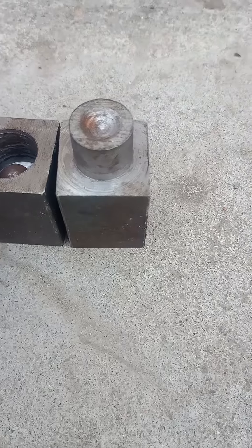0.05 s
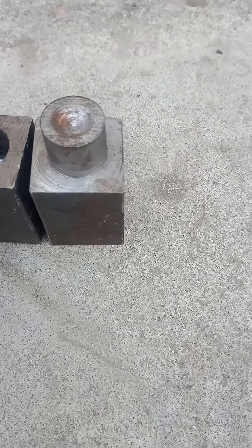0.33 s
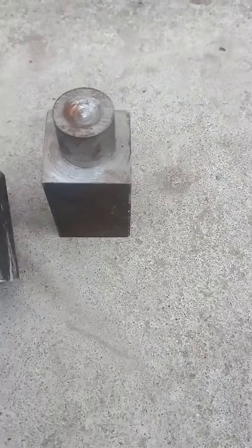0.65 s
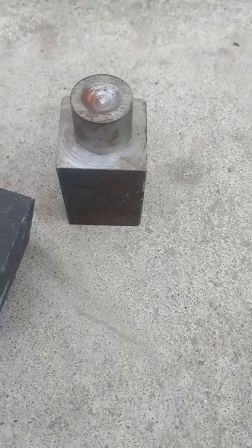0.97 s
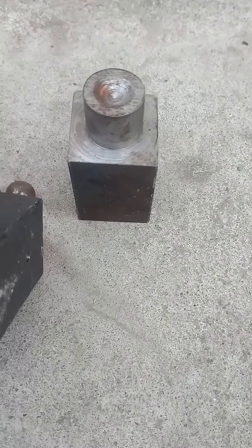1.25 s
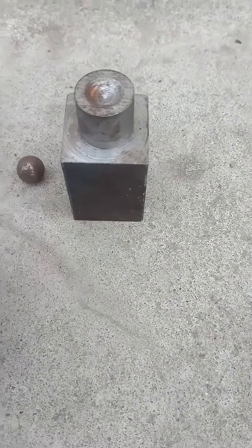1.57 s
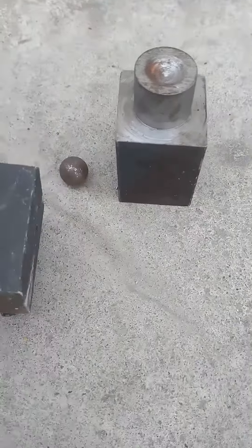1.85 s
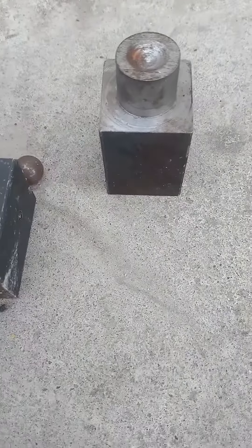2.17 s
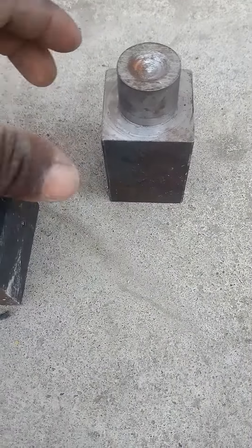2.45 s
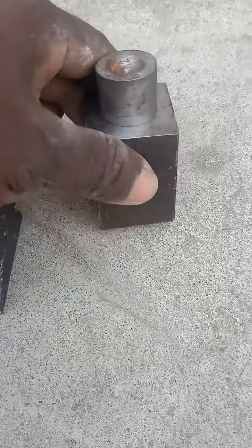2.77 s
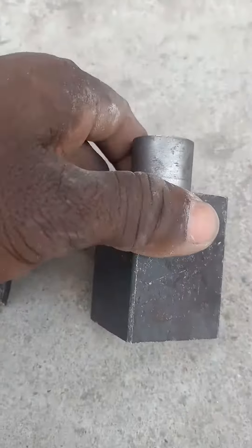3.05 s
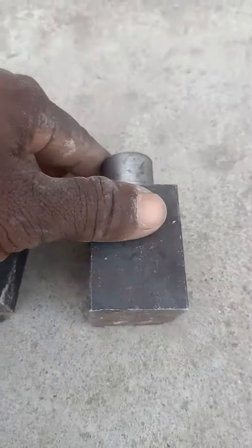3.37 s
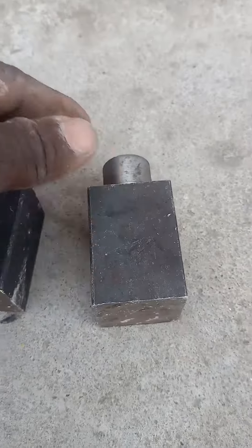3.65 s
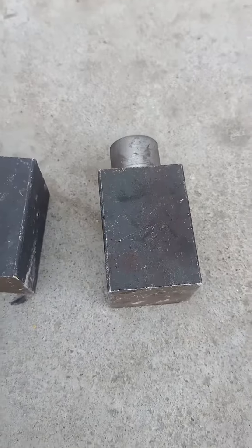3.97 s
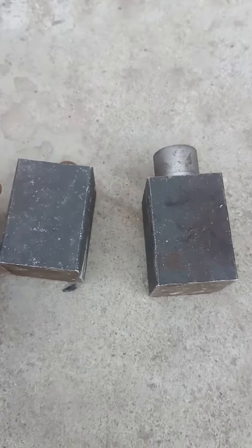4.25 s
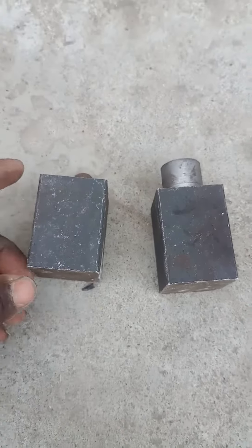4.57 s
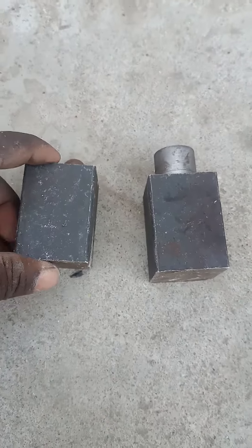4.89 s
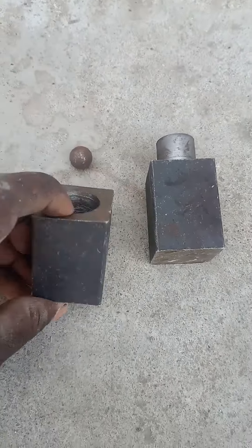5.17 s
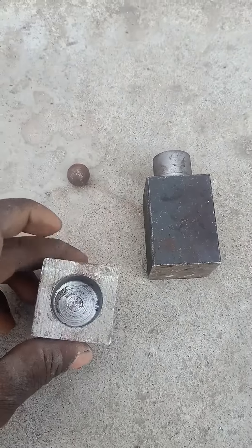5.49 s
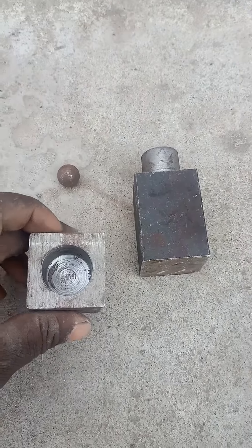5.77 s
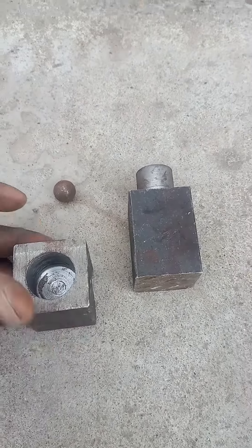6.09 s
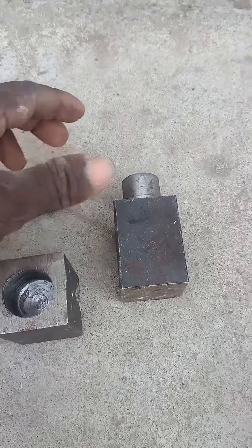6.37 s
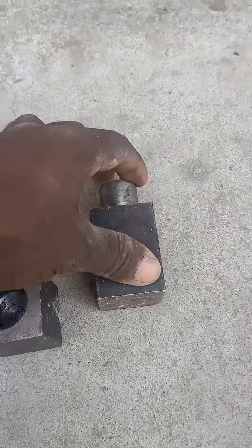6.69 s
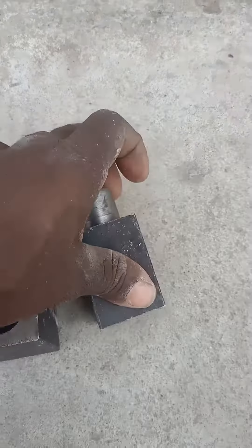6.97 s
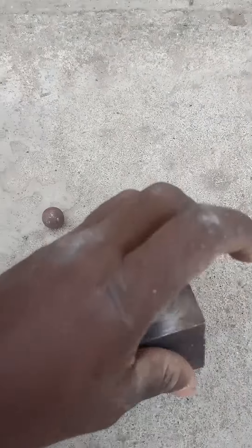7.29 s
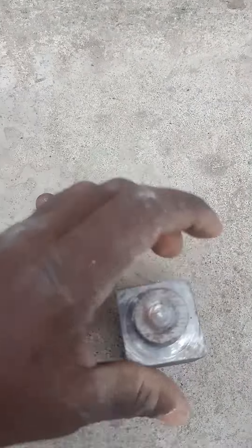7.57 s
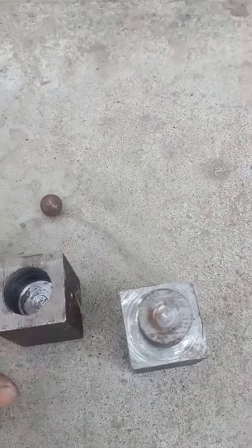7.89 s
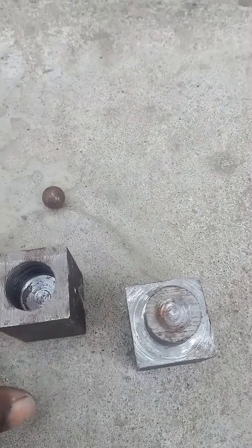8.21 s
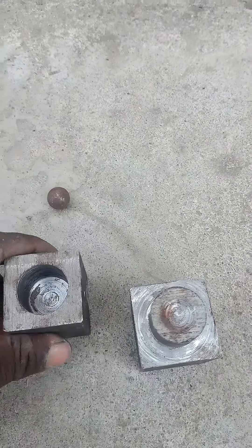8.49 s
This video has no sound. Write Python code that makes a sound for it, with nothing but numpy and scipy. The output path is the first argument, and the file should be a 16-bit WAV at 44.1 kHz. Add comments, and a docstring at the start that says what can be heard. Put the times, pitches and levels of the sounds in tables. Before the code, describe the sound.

An angle grinder is already running on steel in a workshop yard with little echo, rising in pitch, its harsh rasp and rough squeals riding over a motor hum. Steel blocks knock on concrete close by at about 0.1, 1.2, 1.4, 1.7 and 2.8 seconds, then more faintly later. Around 1.7 seconds the disc hammers briefly on the work, and the gears whine until 2.7. The tool slows and goes much quieter from 3 to 3.5 seconds, then spins up again, chattering hard from 3.8 to 4.5. The speed sags once more between 5 and 5.7 seconds and partly recovers from 6, with softer grinding and thin squeals. From about 7 seconds the disc coasts down with falling pitch, grazing the steel once a turn in a slowing flutter until the end, near 8.6 seconds.

```python
"""A harsh rasp rises over a motor's hum as an angle grinder bites into steel in a workshop yard.
The disc's high spot scrapes once a turn, rough squeals glide through, and dull knocks sound nearby.
Pressed hard, the tool slows, its bevel gears whine and the disc hammers on the work. The speed sags and
picks up twice; then the disc coasts down in a slowing flutter, grazing the steel once a turn."""
import sys
import numpy as np
from scipy import signal
from scipy.fft import rfft, irfft, next_fast_len
from scipy.io import wavfile
from scipy.ndimage import map_coordinates

SR = 44100
rng = np.random.default_rng(int(sys.argv[2]) if len(sys.argv) > 2 else 0)


def int16_out(signal):
    """Quantize to a 16-bit WAV file."""
    q = np.round(np.clip(np.atleast_2d(signal).T, -1, 1) * 32767)
    wavfile.write(sys.argv[1], SR, q.astype(np.int16))


N = 381332

# Rotation of the disc. Each row: time in seconds, speed in turns per second.
DISC_SPEED = [(0.0, 64.98), (0.13, 72.45), (0.33, 84.36), (0.6, 87.0), (1.15, 88.6), (1.4, 83.12),
              (1.68, 82.96), (1.88, 71.81), (2.7, 70.79), (3.02, 46.01), (3.25, 35.42), (3.49, 33.16),
              (3.62, 64.51), (3.82, 79.37), (3.98, 72.16), (4.95, 71.75), (5.2, 53.19), (5.53, 47.71),
              (5.72, 35.58), (6.2, 51.14), (6.87, 56.64), (7.12, 45.97), (7.6, 29.85), (8.15, 16.82),
              (8.65, 8.64)]
# Hand pressure. Each row: time in seconds, pressure in dB, the work's low body against the rasp in dB.
PRESSURE = [(0, -1, -5.5), (.85, -1, -3), (1.3, -5, -3), (1.63, -6.5, -3.5), (1.7, -1, -5),
            (1.9, -1.5, -7.5), (2.68, 1, -7.5), (2.86, -2, -3.5), (2.99, -9.5, -13), (3.48, -9.5, -8.5),
            (3.86, -3.5, -3.5), (4.45, -3, -10), (4.95, -1, -6.5), (5.2, -1.5, -6.5), (5.87, 1, -10),
            (5.98, -7.5, -11.5), (6.9, -4, -7.5), (7.2, -4.5, -11), (7.8, -3, -15.5), (8.65, 2.5, 0)]
# The disc digs in briefly. Each row: time in seconds, extra level in dB.
BITES = [(0.049, 4.5), (1.115, 1.5), (1.36, 4), (3.85, 4.5), (6.64, 1.5)]
# The high spot's stroke. Each row: turns per second, share of the force (0-1), width in turns,
# share of the grit that repeats each turn (0-1).
STROKE_BY_SPEED = [(10, 0.42, .2, 0), (25, 0.66, .17, 0), (40, 0.67, .12, .1), (53, 0.6, .09, .15),
                   (71, 0.47, .12, .35), (88, 0.4, .12, .15)]
# Rotor harmonics. Each row: multiple of the disc speed, relative level in dB.
HUM_ORDERS = [(1, -11), (2, -10), (3, -0.5), (4, -2), (5, 4), (6, -10.5), (7, -4.5), (8, 2.5), (9, -5),
              (11, -7)]
# Imbalance grows with speed. Each row: turns per second, hum level in dB before pressure is added.
HUM_BY_SPEED = [(30, -70), (45, -61), (56, -50), (65, -45), (71, -38), (88, -36)]
# Impacts. Each row: time in seconds, relative clack level in dB, relative thud level in dB.
KNOCKS = [(0.143, 9.5, -20), (.72, -18, -40), (1.152, 2, -39), (1.163, -6, -24.5), (1.393, 14, -20.5),
          (1.407, -11, -41), (1.669, 8.5, -30), (2.776, 0, -27), (2.792, -24, -28), (3.511, -5, -45),
          (2.829, -14, -34.5), (4.921, -6, -28.5), (7.465, -10, -53)]  # nearby
DISC_BLOWS = [(1.683, 7, -38), (1.693, 1, -26), (1.717, 10.5, -34), (1.732, -2, -26), (1.743, 1, -29),
              (1.761, -17, -25.5), (1.809, 7, -28), (1.975, -8, -29), (2.143, 5, -39), (3.837, 5.5, -37),
              (3.887, -1, -29), (3.902, 10, -32), (3.913, 0, -29), (3.941, 3, -40), (3.970, 3, -27),
              (3.982, 9, -32), (4.022, 2, -25), (4.037, 10, -27), (4.051, 7, -26), (4.078, 12, -28),
              (4.119, 7.5, -39), (4.134, -5, -29), (4.147, -1, -33), (4.216, 1, -26.5), (4.355, 7, -26),
              (4.369, -7, -29), (4.382, 4, -26), (4.410, 4.5, -31)]  # the hardest blows of the hammering disc
# Rough, gliding squeals and whines of the grinder and the steel. Each row: start and end in seconds,
# first and last pitch in Hz, bandwidth in Hz, level in dB.
SQUEALS = [(0.2, 1.5, 2370, 2440, 200, -29), (1.7, 2.06, 2400, 2520, 160, -25),
           (2.7, 2.89, 2230, 1800, 480, -26), (0.394, 1.398, 3067, 3190, 330, -27),
           (2.89, 2.97, 740, 780, 130, -40), (3.001, 3.166, 2710, 2760, 180, -37),
           (3.528, 3.611, 2700, 3150, 260, -37), (3.8, 4.3, 2560, 2520, 200, -29),
           (4.9, 5.75, 620, 575, 80, -42.5), (6.049, 7.399, 1753, 1401, 280, -40.5),
           (6.501, 7.149, 3088, 2950, 260, -35), (7.1, 8.17, 2560, 2510, 220, -43),
           (7.98, 8.14, 1380, 1220, 45, -46), (8.18, 8.5, 3920, 4080, 200, -48)]
# Bouts of lighter hammering. Each row: start and end in seconds, initial level in dB.
CHATTER_BOUTS = [(1.65, 2.29, -27), (3.82, 4.473, -23.5)]
# Gears sing, loaded or coasting. Each row: start and end in seconds, relative level in dB, rise in seconds.
GEAR_BOUTS = [(1.9, 2.7, -19.5, 0.45), (4.546, 5.0, -25.5, 0.25), (3.17, 3.5, -42.5, 0.1),
              (7.18, 8.56, -41.5, 0.1)]
# Light contact. Each row: start and end in seconds, level in dB, stroke width in turns.
GRAZE_BOUTS = [(2.96, 3.42, -43.5, .05), (7.02, 7.46, -36.5, .045), (7.47, 8.13, -41, .13)]

# Spectra. Each row: frequency in Hz, relative level in dB.
SCRAPE = [(760, -67), (1300, -10.5), (1490, -13), (1690, -7), (2220, -3), (2450, -0.5), (2800, -2),
          (3100, -3), (3720, -8.5), (4100, -9.5), (4530, -12), (5100, -10.5), (5480, -16), (6200, -12.5),
          (8060, -112), (13600, -120)]  # abrasive on steel
WORK_BODY = [(76, -62), (130, -34), (257, -14), (301, -16), (379, -14), (430, -12), (560, -3.5),
             (660, -1.5), (760, 1), (950, -1), (1230, -5.5), (1600, -8), (2080, -4), (3520, -120)]  # low vibration of the work
HIGH_RING = [(5500, -21.5), (6250, -5.5), (6500, 13), (6800, 7), (7300, 2.5), (8000, -14), (9000, -19.5),
             (12500, -37), (15600, -62)]  # high ringing in the rasp
FIZZ = [(7000, -64), (9000, -7.5), (12500, -7.5), (13600, -4), (14400, 1.5), (15600, -23)]  # topmost hiss of the rasp
HOUSING = [(140, -3), (180, 0), (215, 4), (280, -1.5), (360, -3), (440, 7.5), (500, 12.5), (600, 2),
           (900, 4)]  # response of the motor housing
YARD = [(25, -36), (45, -24), (75, 15.5), (120, 10), (200, 14.5), (500, 1), (1500, 24), (4000, -32),
        (9000, -46), (14000, -66)]  # background noise
KNOCK_CLACK = [(200, -8.5), (800, 17), (2200, 6), (4000, -9), (8000, -12), (14000, -38)]  # bright part of a knock
IMPACT_THUD = [(25, -29), (80, -1.5), (200, 2.5), (400, -2), (900, -18), (3000, -29), (9000, -34.5)]  # low part of a knock or blow
CHATTER_CRUNCH = [(25, -32), (80, -2.5), (180, -2), (350, -7), (800, -2), (1500, -8), (2800, -7),
                  (8000, -36), (12000, -34.5), (14000, -21), (15600, -40)]  # the bouncing disc
BLOW_CRACK = [(150, -12), (500, 10.5), (900, 16), (1600, 14.5), (2600, 9), (4500, -5), (9000, -32),
              (14000, -19), (15600, -28)]  # bright part of a hard blow
GEARBOX = [(250, -10), (600, -4), (770, 3), (1000, -0.5), (2400, 0), (3500, -8), (6000, -20)]  # response of the gear head
GRAZE_CLACK = [(500, -20), (1300, 0), (2600, 1), (4000, -4), (5800, -11), (6700, -2), (9000, -42)]  # the disc barely touching

# Coherence of noise between the channels. Each row: frequency in Hz, left-right correlation (0-1).
COHERENCE = [(150, 0.83), (600, 1), (2500, 0.11), (12000, 0.038)]
# Shading of the direct sound. Each row: frequency in Hz, left minus right in dB.
BALANCE = [(100, -10.5), (190, -3.5), (400, -1), (700, 0.5), (2400, -3), (5000, -6), (7500, 2), (13000, 1)]
# Reverberation of the walls. Each row: frequency in Hz, time to fall 60 dB in seconds.
WALL_DECAY = [(150, 0.18), (2000, 0.18), (10000, 0.06)]


def amp(db):
    """Amplitude ratio for a level in decibels."""
    return 10 ** (np.asarray(db) / 20)


def unit(x):
    """The signal scaled to rms 1."""
    return x / np.sqrt(np.mean(x ** 2) + 1e-20)


def along(points, hz):
    """Interpolation of (Hz, value) points on a logarithmic frequency axis."""
    f, v = np.transpose(points)
    return np.interp(np.log(hz + 1), np.log(f + 1), v)


def curves(rows):
    """Linear interpolation in time: one value per sample for each column after the first."""
    s, *columns = np.transpose(rows)
    return [np.interp(np.arange(N) / SR, s, column) for column in columns]


def drift(rate):
    """Low-pass noise: a smooth curve through `rate` random knots a second."""
    return map_coordinates(rng.standard_normal(int(N * rate / SR) + 4), [np.arange(N) * rate / SR])


def swell(start, end, attack_s, release_s):
    """Envelope from 0 to 1: a linear rise from start, an exponential decay after end."""
    t = np.arange(N) / SR
    return np.clip((t - start) / attack_s, 0, 1) * np.exp(-np.maximum(t - end, 0) / release_s)


def filtered(x, response):
    """Linear filtering: the spectrum of x is multiplied by a frequency response."""
    size = next_fast_len(N + SR // 2)
    return irfft(rfft(x, size) * response(np.fft.rfftfreq(size, 1 / SR)), size)[..., :N]


def narrowband(phase, width_hz):
    """Random quadrature modulation spreads a tone into a noise band of rms 1."""
    return unit(drift(width_hz) * np.cos(phase) + drift(width_hz) * np.sin(phase))


def stroke(turns, share, lead, width):
    """Periodic forcing, rms near 1: the high spot bites fast and lets go slowly. Lead, width in turns."""
    u = (turns + lead) % 1 / width
    bite = u ** 2 * np.exp(2 * (1 - u))
    share = np.clip(share, 0, 1)
    power = (1 - share) ** 2 + 2 * share * (1 - share) * bite.mean() + share ** 2 * np.mean(bite ** 2)
    return (1 - share + share * bite) / np.sqrt(power)


def grit(spectrum, force, grain_db, turns=0, repeat=0):
    """Source and filter: uneven grains, scaled by a force, make coloured stereo noise of rms 1."""
    rim_grains = 600
    contact = np.atleast_1d(turns) % 1 * rim_grains  # the same grains come round each turn
    rim = [map_coordinates(row, [contact], order=1, mode="grid-wrap")
           for row in rng.standard_normal((2, rim_grains))]
    repeat = np.clip(repeat, 0, 1)
    grains = np.sqrt(1 - repeat) * rng.standard_normal((2, N)) + np.sqrt(repeat) * unit(np.array(rim))
    grains = grains * force * amp(grain_db * drift(1500))

    def mid_side_response(hz):
        spread = np.arccos(np.clip(along(COHERENCE, hz), 0, 1)) / 2
        return amp(along(spectrum, hz)) * [np.cos(spread), np.sin(spread)]

    mid, side = filtered(grains, mid_side_response)
    return unit(np.array([mid + side, mid - side]))


def rasp(turns, speed):
    """Friction noise: abrasive grains scrape and shake the steel, louder with speed and pressure."""
    base_db, db_per_decade, working_speed, bite_s = -22, 25, 72, 0.04
    t = np.arange(N) / SR
    pressure_db, body_db = curves(PRESSURE)
    bite_db = sum(db * np.exp(-.5 * ((t - s) / bite_s) ** 2) for s, db in BITES)
    level_db = base_db + db_per_decade * np.log10(speed / working_speed) + pressure_db + bite_db
    level_db += 0.31 * drift(30)  # the hand's pressure is never even
    speeds, *columns = np.transpose(STROKE_BY_SPEED)
    share, width, repeat = (np.interp(speed, speeds, column) for column in columns)
    force = stroke(turns, share, lead=0.24, width=width) * amp(1.27 * drift(70))
    softer = stroke(turns, 0.84 * share, lead=0.39, width=0.13)
    scrape = amp(level_db + 0.4) * grit(SCRAPE, force, grain_db=1.5, turns=turns, repeat=repeat)
    body = grit(WORK_BODY, force, grain_db=1.0, turns=turns, repeat=repeat / 2)
    body *= amp(level_db + body_db + 0.5)
    ring = amp(0.77 * level_db - 14.5 + 2 * drift(25)) * grit(HIGH_RING, softer, grain_db=5.0)
    fizz_db = -47.5 + 1.28 * (level_db - base_db) + 1.2 * drift(15)
    return scrape + body + ring + amp(fizz_db) * grit(FIZZ, softer, grain_db=-0.5)


def motor(turns, speed):
    """Forced vibration: imbalance hums in harmonics; the armature tone peaks at the casing's resonance."""
    armature_order, casing_hz, half_width_hz = 9.42, 824, 42
    pressure_db, _ = curves(PRESSURE)
    hum_db = np.interp(speed, *np.transpose(HUM_BY_SPEED)) + pressure_db
    hum = np.zeros(N)
    for order, db in HUM_ORDERS:
        gain = amp(db + along(HOUSING, order * speed) + 2 * drift(14))
        hum += gain * np.sin(2 * np.pi * (order * turns + rng.random()) + 0.4 * drift(40))
    resonance = 1 / (1 + ((armature_order * speed - casing_hz) / half_width_hz) ** 2)
    spin = 2 * np.pi * armature_order * turns
    armature = np.sin(spin + .5 * drift(40)) + .55 * narrowband(spin, width_hz=90)
    return amp(hum_db) * unit(hum) + amp(-31.5) * resonance * unit(armature)


def yard():
    """Ambient noise: a faint, steady background."""
    return amp(-51) * grit(YARD, force=1, grain_db=-0.5)


def struck(spectrum, size=4096):
    """Minimum-phase impulse response of energy 1, from the folded cepstrum of a spectrum."""
    cepstrum = irfft(np.log(amp(along(spectrum, np.fft.rfftfreq(size, 1 / SR)))))
    cepstrum[1:size // 2] *= 2
    cepstrum[size // 2 + 1:] = 0
    response = irfft(np.exp(rfft(cepstrum)))
    return response / np.linalg.norm(response)


def impacts(rows, clack_spectrum):
    """Impulse excitation: each hard contact gives a short clack and, a millisecond later, a low thud."""
    clack_pulses, thud_pulses = np.zeros((2, N))
    for s, clack_db, thud_db in rows:
        clack_pulses[round(s * SR)] = amp(clack_db - 1.5)
        thud_pulses[round((s + .001) * SR)] = amp(thud_db + 26.0)
    clacks = signal.fftconvolve(clack_pulses, struck(clack_spectrum))
    thuds = signal.fftconvolve(thud_pulses, struck(IMPACT_THUD))
    return (clacks + thuds)[:N]


def squeals(turns):
    """Narrow-band noise: rough, gliding squeals and whines of grinder and steel, pulsing once a turn."""
    t = np.arange(N) / SR
    voice = np.zeros(N)
    for start, end, start_hz, end_hz, width_hz, db in SQUEALS:
        progress = np.clip((t - start) / (end - start), 0, 1)
        phase = 2 * np.pi * np.cumsum(start_hz + progress * (end_hz - start_hz)) / SR
        arch = 2 * np.sqrt(progress * (1 - progress))
        voice += amp(db) * arch * narrowband(phase, width_hz)
    return voice * stroke(turns, share=.86, lead=.29, width=.13)


def chatter(turns):
    """Contact bounce: the pressed disc strikes once a turn in crunches of uneven size; each bout fades."""
    sag_db_per_s, decay_turns = 13, 0.14
    t = np.arange(N) / SR
    level = np.zeros(N)
    for start, end, db in CHATTER_BOUTS:
        bout_db = db - sag_db_per_s * np.maximum(t - start, 0)
        level += amp(bout_db) * swell(start, end, attack_s=0.017, release_s=0.041)
    bounce, turns_since = np.divmod(turns + .13, 1)
    size_db = 2.6 * np.clip(rng.standard_normal(N), -2, 1.3)
    force = level * unit(amp(size_db[bounce.astype(int)]) * np.exp(-turns_since / decay_turns))
    return np.sqrt(np.mean(force ** 2)) * grit(CHATTER_CRUNCH, force, grain_db=2.0)


def gears(turns, speed):
    """Phase modulation: runout and uneven teeth swing the mesh tone; at low speed backlash rattles it."""
    teeth, runout_rad, tooth_error_rad = 33, .8, .4
    rattle_from, rattle_full, rattle_db = 37, 32, 1.5  # backlash opens between these turns per second
    level = sum(amp(db) * swell(start, end, rise, release_s=0.05) for start, end, db, rise in GEAR_BOUTS)
    rattle = np.clip((rattle_from - speed) / (rattle_from - rattle_full), 0, 1)
    angle = 2 * np.pi * turns
    swing = runout_rad * np.sin(angle) + tooth_error_rad * np.sin(4 * angle)
    mesh = teeth * angle + swing * (1 - rattle / 2) + 0.12 * drift(120) + 0.3 * rattle * drift(55)
    fundamental = np.sin(mesh) + .35 * narrowband(mesh, width_hz=300)
    overtones = np.zeros(N)
    for k in (2, 3):
        overtone_db = along(GEARBOX, k * teeth * speed) - 1.1 * k + 1.5 * drift(9)
        overtones += amp(overtone_db) * np.sin(k * mesh + .35 * drift(50))
    tone = 0.9 * amp(along(GEARBOX, teeth * speed)) * fundamental + rattle * overtones
    bursts = stroke(turns, share=.82, lead=.29, width=.19)
    return level * amp(rattle_db * rattle + drift(60)) * tone * bursts


def grazes(turns):
    """Intermittent contact: only the disc's high spot clacks on the steel, with quiet between turns."""
    force = np.zeros(N)
    for start, end, db, width in GRAZE_BOUTS:
        level = amp(db) * swell(start, end, attack_s=0.05, release_s=0.05)
        force += level * stroke(turns, share=1, lead=.245, width=width)
    return np.sqrt(np.mean(force ** 2)) * grit(GRAZE_CLACK, force, grain_db=0)


def walls(x):
    """Diffuse reflection: convolution with a short decaying noise, different in each channel."""
    hz, t, noise = signal.stft(rng.standard_normal((2, SR // 3)), SR, nperseg=256)
    decay = amp(-60 * t / along(WALL_DECAY, hz)[:, None])
    _, tail = signal.istft(noise * decay, SR, nperseg=256)
    return signal.fftconvolve(np.atleast_2d(x), tail / np.linalg.norm(tail[0]), axes=1)[:, :N]


def placed(x, lag_s):
    """Time and level cues: sound from the right reaches the left channel later and a little shaded."""
    sides = np.array([[1], [-1]]) / 2
    return filtered(x, lambda hz: amp(sides * along(BALANCE, hz))
                    * np.exp(-2j * np.pi * hz * lag_s * sides))


def scene():
    """Superposition: the direct sound of grinder and knocks, their reflections and the quiet yard."""
    speed, = curves(DISC_SPEED)
    turns = np.cumsum(speed) / SR
    whine = gears(turns, speed) + squeals(turns)
    hum = motor(turns, speed)
    grinding = rasp(turns, speed) + chatter(turns)
    knocks = impacts(KNOCKS, KNOCK_CLACK)
    blows = impacts(DISC_BLOWS, BLOW_CRACK)
    clacks = grazes(turns)
    reflections = (amp(-7.5) * walls(grinding + clacks)
                   + amp(-5.5) * walls(whine + hum / 2)
                   + amp(-4.5) * walls(knocks + blows / 2))
    sources = grinding + hum + knocks + blows + clacks
    # the tool drifts towards the middle: first the balance shifts, later the lag shortens
    centring_db = np.array([[1], [-1]]) * swell(4.35, N / SR, attack_s=0.25, release_s=1)
    shift = np.pi / 2 * swell(6.5, N / SR, attack_s=0.19, release_s=1)
    direct = np.cos(shift) * placed(sources, lag_s=.0003425)
    direct += np.sin(shift) * placed(sources, lag_s=.00019)
    direct += placed(whine, lag_s=.00006)  # the gear head sits nearer the middle
    return amp(centring_db) * direct + reflections + yard()


def record(dry):
    """Soft saturation rounds the peaks near full scale; a low-pass filter limits the band."""
    ceiling, top_hz = .9, 15650
    rounded = dry / (1 + (dry / ceiling) ** 6) ** (1 / 6)
    return filtered(rounded, lambda hz: hz < top_hz)


dry = scene()
out = record(dry)
int16_out(out)
```